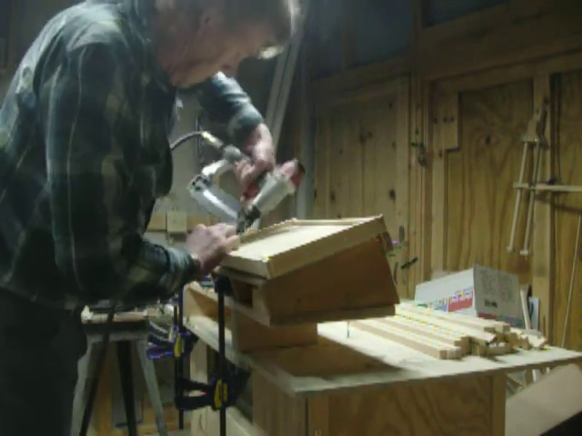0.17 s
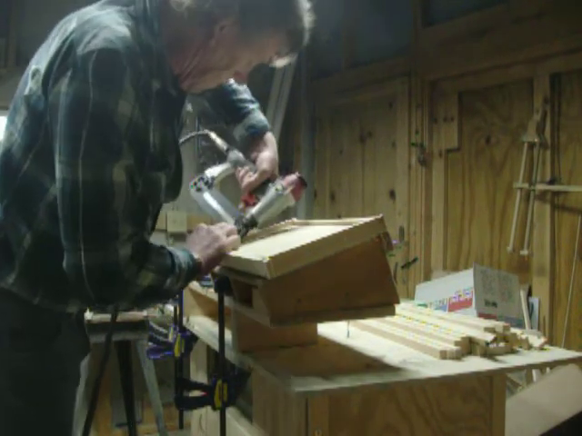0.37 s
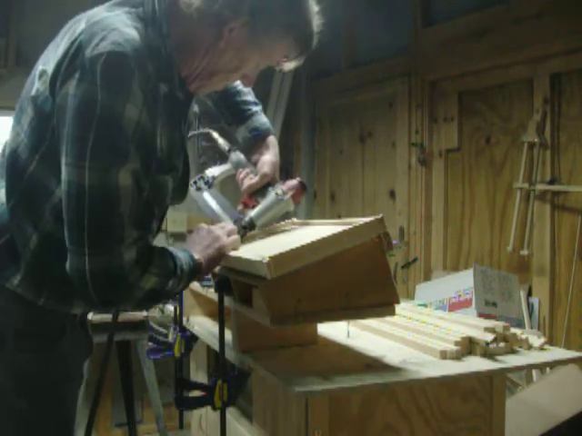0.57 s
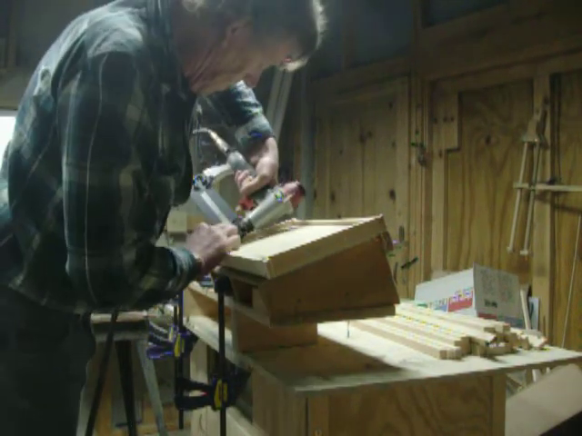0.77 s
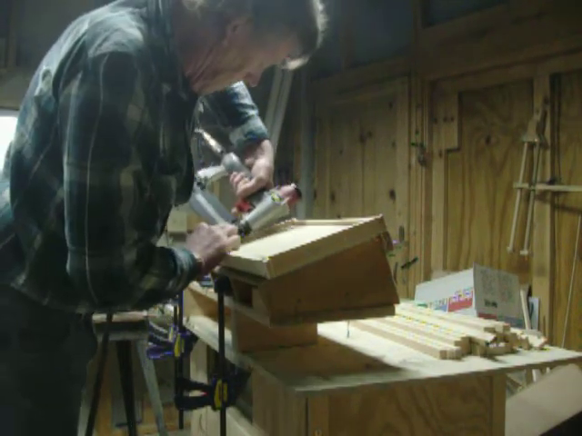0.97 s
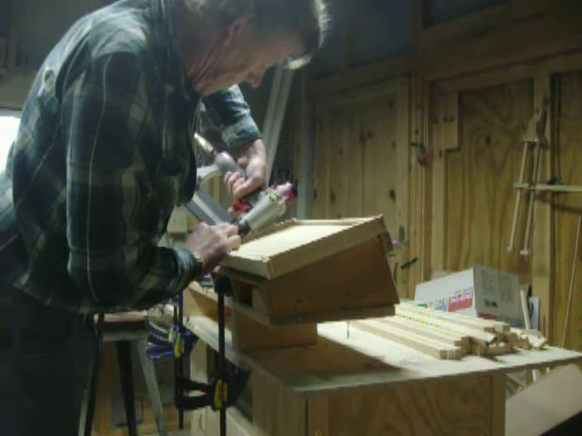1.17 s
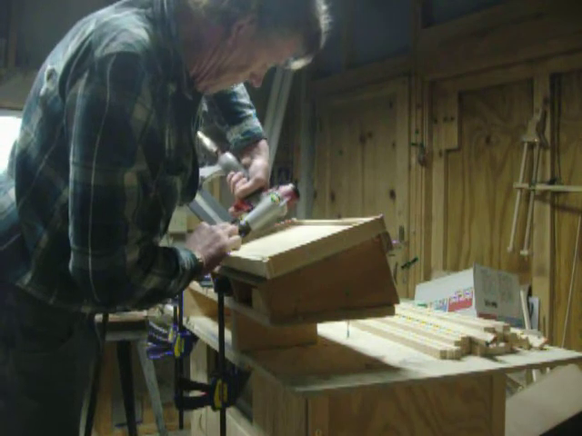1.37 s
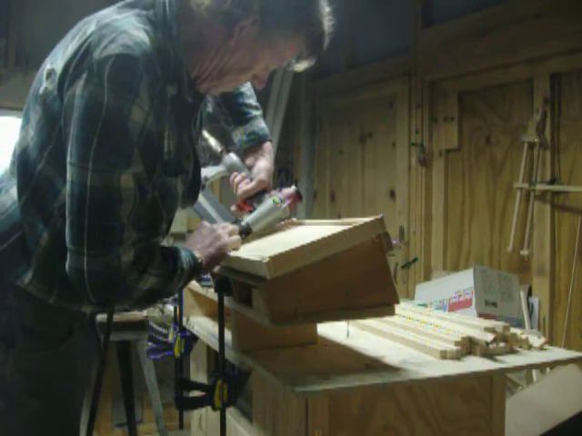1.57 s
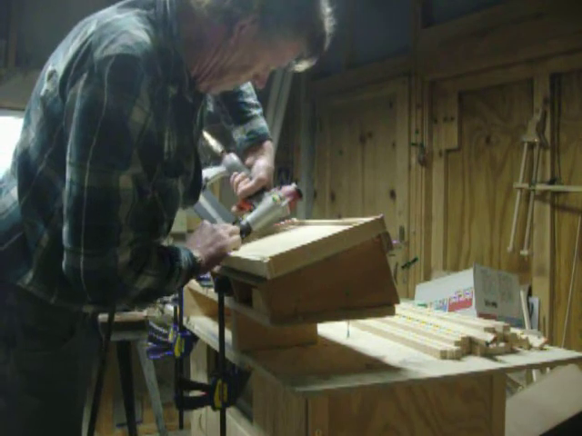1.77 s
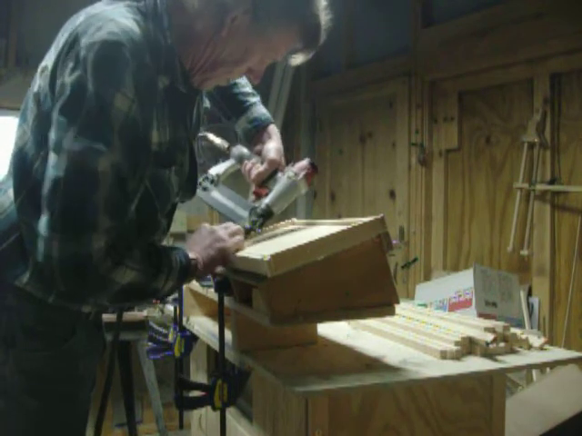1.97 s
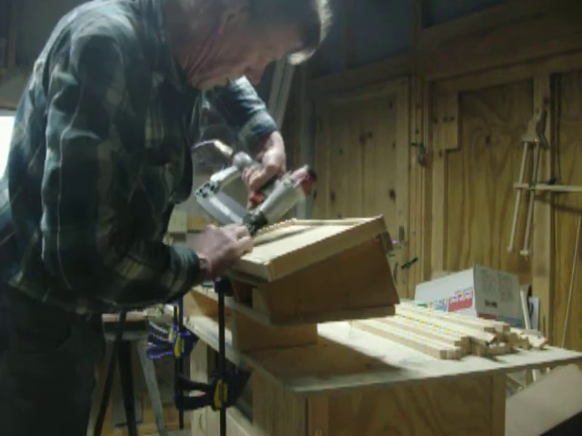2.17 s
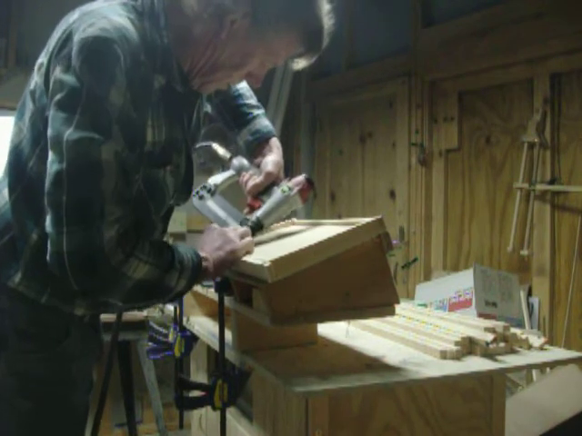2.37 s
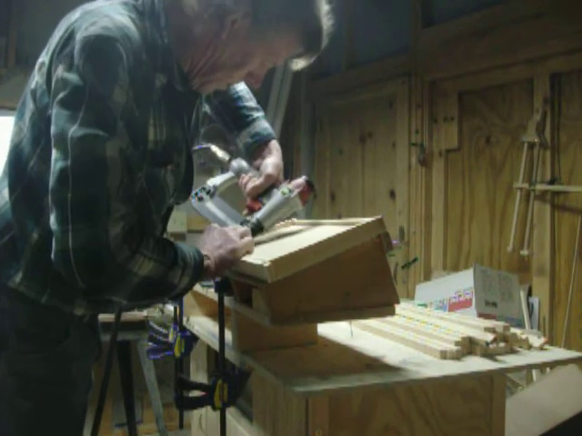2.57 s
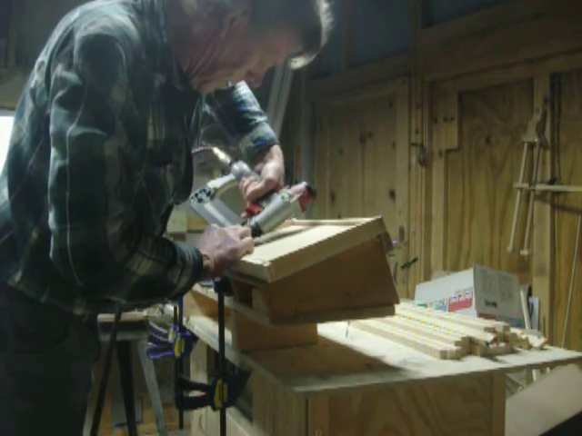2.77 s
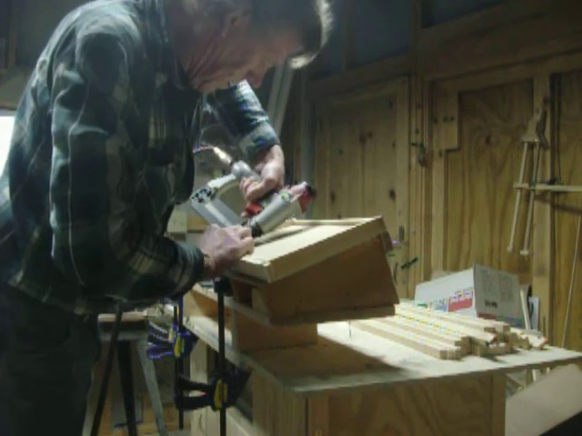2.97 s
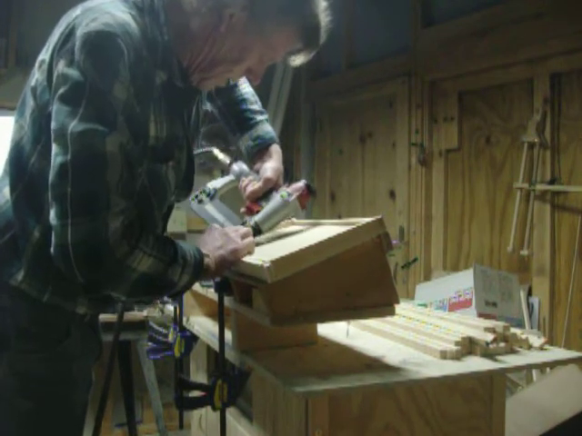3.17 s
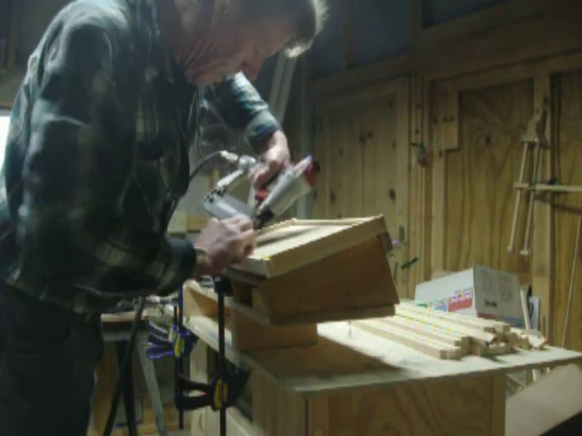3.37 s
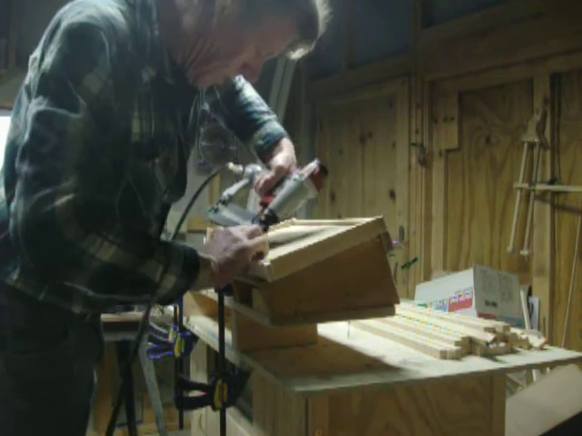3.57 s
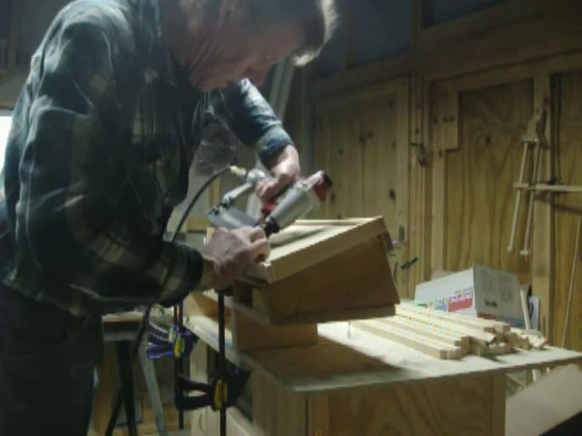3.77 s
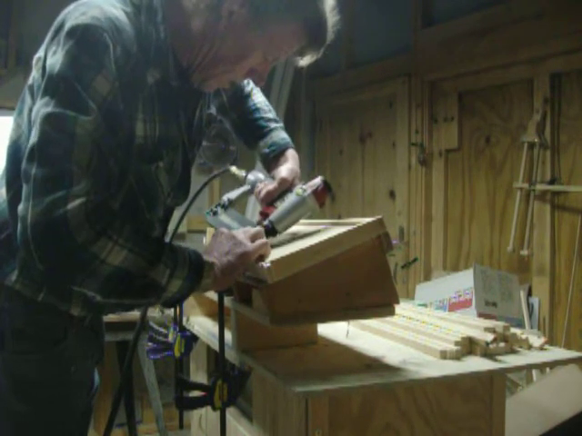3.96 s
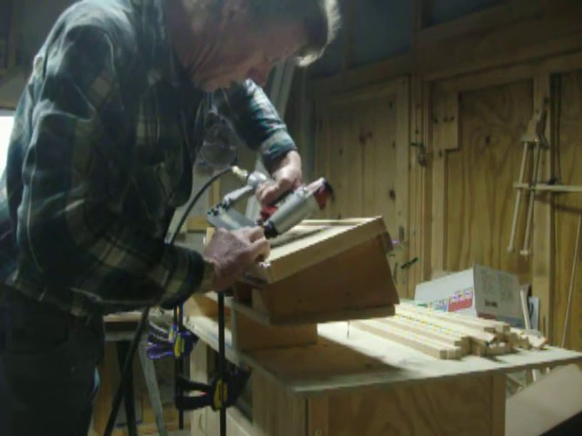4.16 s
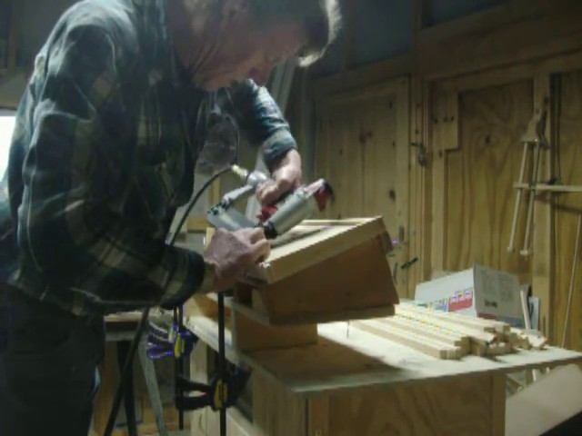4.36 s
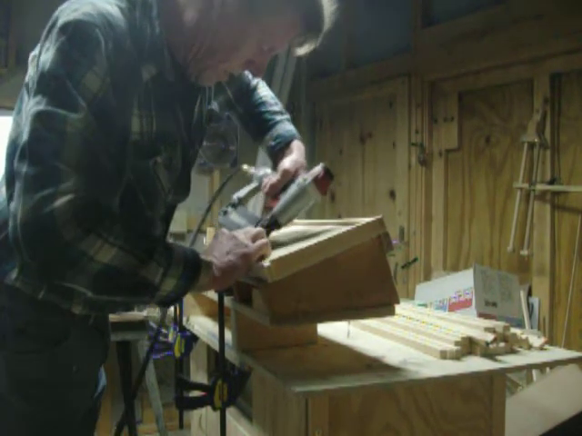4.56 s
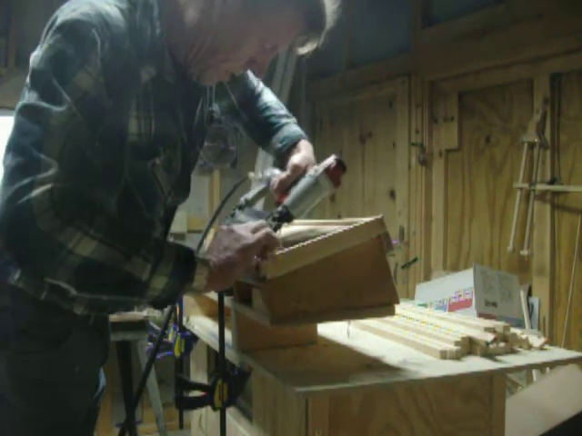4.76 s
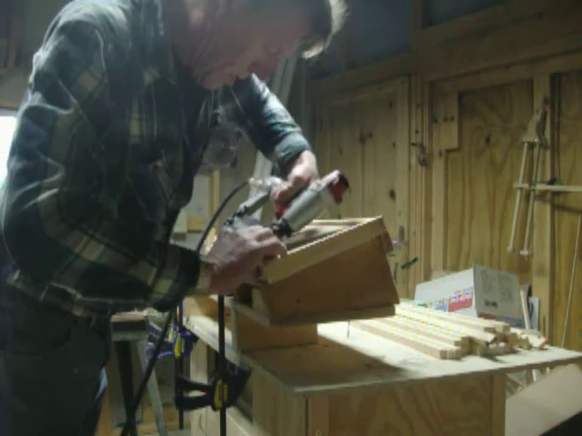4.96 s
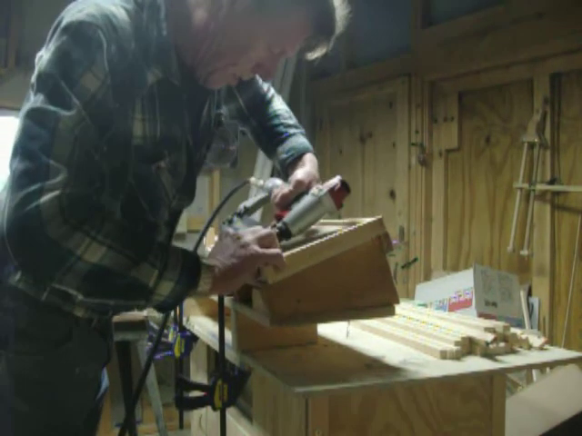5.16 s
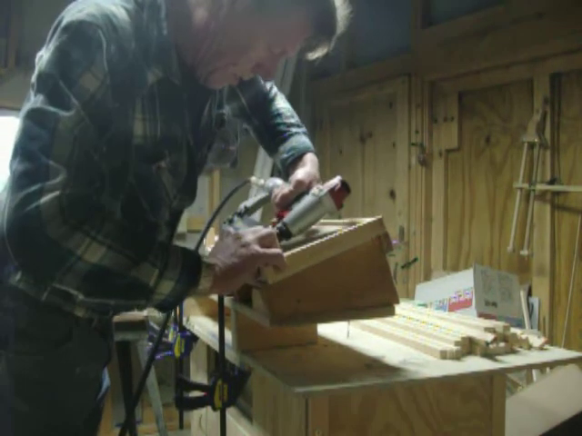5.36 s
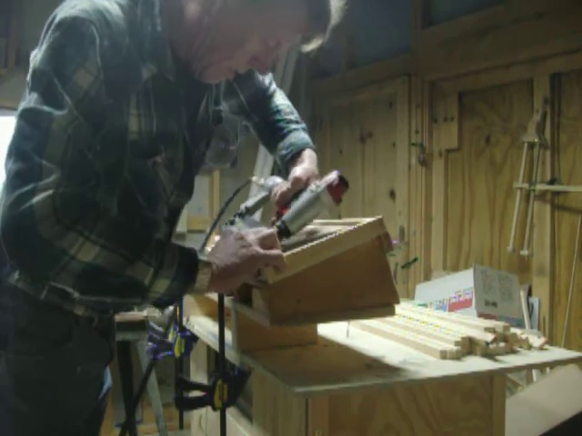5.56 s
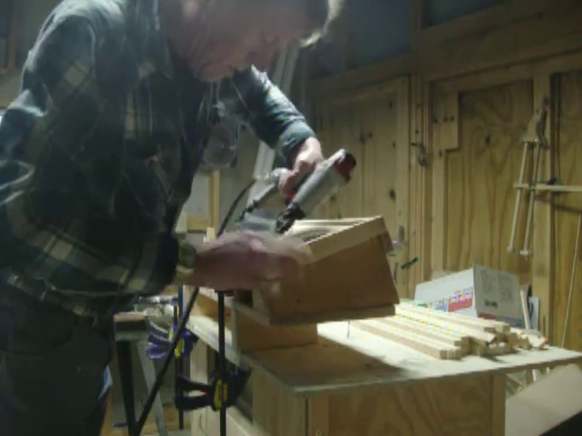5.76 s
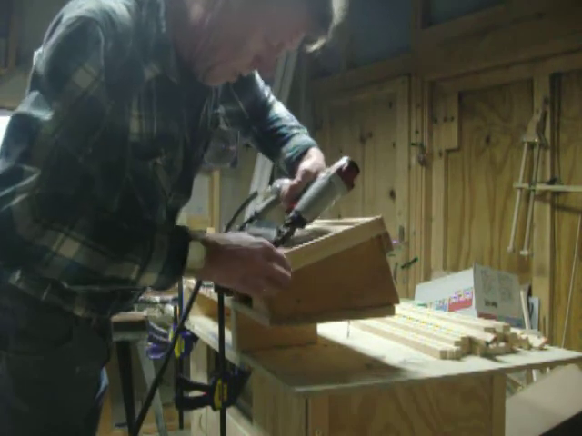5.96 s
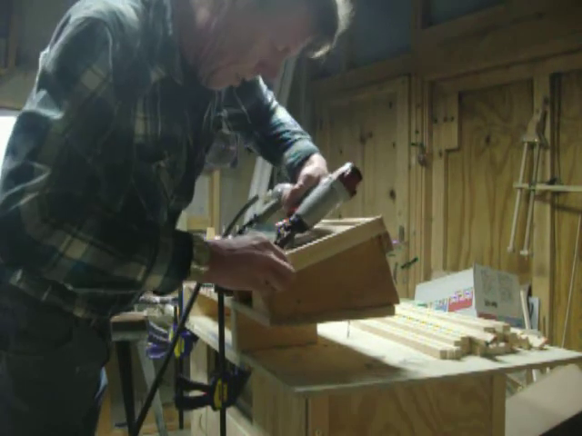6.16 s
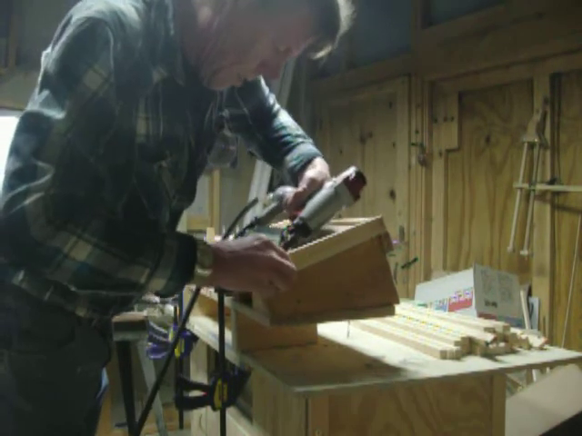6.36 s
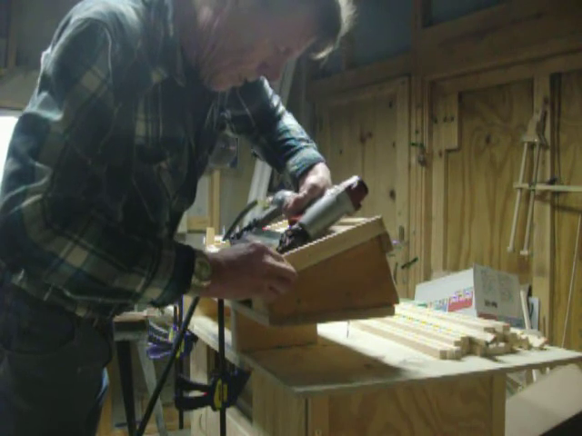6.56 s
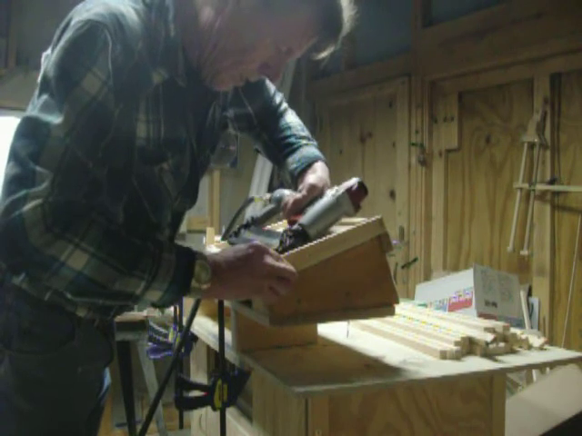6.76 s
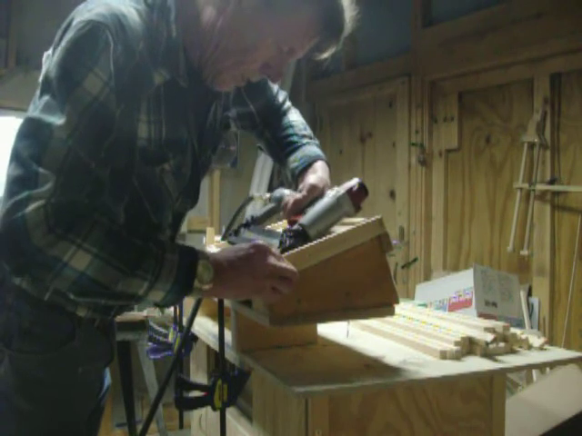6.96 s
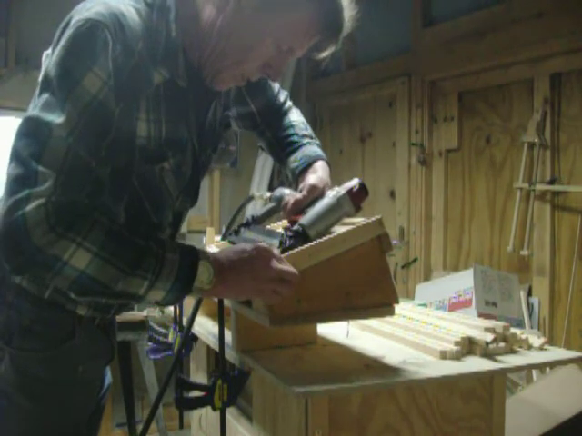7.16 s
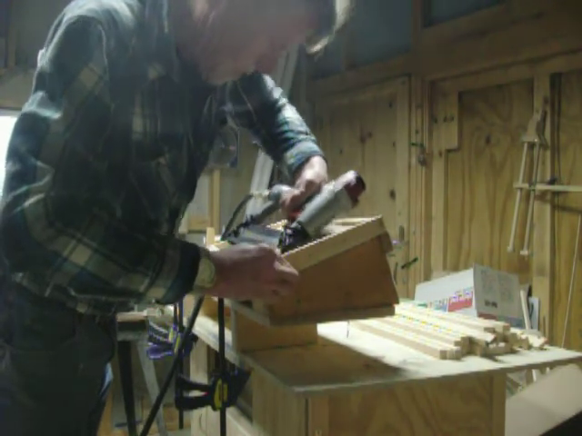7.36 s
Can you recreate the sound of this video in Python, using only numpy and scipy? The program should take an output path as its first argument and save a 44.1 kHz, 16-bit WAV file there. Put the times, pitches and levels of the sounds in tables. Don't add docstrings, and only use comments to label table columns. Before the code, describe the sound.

Close, rough, slightly clipped sound of brad nailing in a shed. Light metal ticks, a nose tap on wood and a faint squeak come first, then five separate double-hit shots: hiss and bang, followed by puff and knock. Wood drags and sharp safety clicks fill the gaps, with a busier clatter before the last shot. Shop hum and hiss sink after shots and swell back; echoes are short.

```python
import sys
import numpy as np
from scipy import signal
from scipy.io import wavfile
from scipy.ndimage import uniform_filter1d

SR = 44100
rng = np.random.default_rng(int(sys.argv[2]) if len(sys.argv) > 2 else 0)


def invert_db(x):
    u = np.asarray(x, float) / 20
    return 10 ** u


def wrap_up_sound(samples):
    columns = np.atleast_2d(samples).T
    tamed = np.clip(columns, -1, 1)
    steps = np.round(tamed * 32767).astype(np.int16)
    wavfile.write(sys.argv[1], SR, steps)


N = 326340

# (frequency [Hz], time to fall 60 dB [s])
SHOP_ECHO = [(60, 0.12), (150, 0.12), (300, 0.22), (600, 0.42), (1200, 0.34), (2500, 0.4), (4000, 0.38),
             (6000, 0.31)]
# (frequency [Hz], level [dB per Hz])
RUMBLE_COLOUR = [(15, -50), (28, -17), (54, -3.5), (86, -2.5), (140, -2), (167, -3), (190, 3.5), (250, -29),
                 (420, -120)]
# (frequency [Hz], level [dB per Hz])
HISS_COLOUR = [(170, -35), (290, -0.5), (393, 0), (596, -1), (975, -6.5), (1130, -7.5), (1520, -9),
               (2160, -9.5), (2820, -10), (2960, -11.5), (3910, -9), (5370, -24), (5940, -31), (7720, -80),
               (13100, -120)]
# (frequency [Hz], width [Hz], level over the hiss [dB])
LEAK = (3950, 460, -9.5)
# (frequency [Hz], width [Hz], level [dB])
FRAME = [(237, 360, 2.5), (442, 240, 8), (658, 130, 7), (789, 43, 8.5), (1007, 220, 9.5), (1255, 200, 3.5),
         (1453, 37, 9), (1950, 250, 8)]
# (strongest at [s], wood level [dB], scrape level [dB], centre of the wood sound [Hz], hold [s])
DRAGS = [(0.0, -43.5, -32, 590, 0.14), (0.267, -42, -57, 540, .012), (2.171, -26.5, -34, 834, 0.0037),
         (3.58, -20.5, -31, 575, .006), (3.686, -32.5, -37, 560, 0.008), (3.884, -31.5, -37.5, 596, 0.003),
         (4.81, -36.5, -40, 1180, .025), (4.844, -24, -29.5, 600, .02), (3.539, -42, -45, 850, .03),
         (6.904, -34, -42, 804, 0.046), (7.062, -26, -42, 590, 0.0044)]
# (frequency [Hz], level [dB per Hz])
TICK_COLOUR = [(710, -52), (1200, -5), (1490, -8), (1770, -9.5), (2280, -3.5), (2490, -5.5), (2570, -3),
               (3230, -4.5), (4000, 4), (5520, -15.5), (5940, -6.5), (7720, -57.5), (13100, -120)]
# (time [s], peak [dB], wood knock [dB], room [dB])
TICKS = [(0.04, -22.5, -58, -3), (0.7886, -27, -34.5, -8), (1.466, -20, -31, -12), (1.574, -27.5, -51, -5),
         (1.5875, -16.5, -33, -4), (2.3456, -27, -36.5, -9.5), (2.4226, -24.5, -29, -7.5),
         (2.5805, -17, -42, -7), (3.018, -18, -56, -0.5), (3.03, -27, -24, -5), (3.7928, -20.5, -56, -10),
         (3.895, -32, -29.5, -13.5), (4.2696, -24.5, -38.5, -5), (4.293, -23.5, -35, -12.5),
         (5.0064, -28.5, -37.5, 8.5), (5.37, -37, -41, -2), (6.006, -29, -45.5, 2),
         (6.162, -25.5, -65, -4.5), (6.712, -27.5, -47, -4), (6.9033, -27, -33, 0), (7.0496, -20, -29, -9)]
# (time [s], peak [dB], wood knock [dB], room [dB])
SET_DOWNS = [
    (0.6175, -5.5, -22, -7),
    (0.635, -12, -25, -24),
    (0.9033, -18.5, -26, -7),
    (0.9095, -12, -24, -10),
    (2.6505, -8, -14.5, -6),
    (6.409, -20, -40, -12),
    (6.4974, -14, -21.5, 0),
    (6.5214, -10, -25, -15.5),
]
# (time [s], peak [dB], wood knock [dB], room [dB])
CLUNKS = [
    (0.71, -49, -62, -7),
    (.745, -39, -60, 0),
    (1.5344, -24.5, -27, -10.5),
    (3.5807, -33, -21, -6),
    (3.686, -26.5, -29, -12),
    (4.28, -28, -34, -12.5),
    (6.5036, -8.5, -17.5, -9),
    (6.743, -34, -67, 5),
]
# (time [s], peak [dB], wood knock [dB],
# room [dB])
TICKS_SHARP = [
    (4.9948, -6, -28.5, -10.5),
    (6.375, -9, -36, -5.5),
    (6.4636, -7, -23, -4.5),
    (6.471, -7, -20.5, -10),
]
# (events, centre [Hz], width [Hz], broad share, rise [s], length [s], echo build-up [s])
PARTS = [(SET_DOWNS, 3320, 3500, 0.32, 0.0031, 0.012, .0026),
         (TICKS, 3630, 2300, 0.62, 0.00039, 0.018, .0026), (CLUNKS, 2550, 1100, 0.26, 0.0047, .018, .004),
         (TICKS_SHARP, 3770, 1400, 0.89, 0.001, 0.0047, 0.0079)]
# (time [s], length [s], start pitch [Hz], end pitch [Hz], level [dB])
SQUEAKS = [
    (0.743, 0.047, 2650, 2950, -40),
    (0.87, .06, 2750, 2500, -44),
    (2.273, 0.038, 2520, 2900, -47),
]
# (time [s], peak [dB], low push [dB], room [dB])
VALVES = [
    (1.6065, -13, -33, -18),
    (3.0452, -14, -31, -18),
    (4.3125, -12, -32, -5),
    (5.4032, -11, -36.5, -8.5),
    (7.1808, -11, -31.5, -7.5),
]
# (frequency [Hz], level [dB per Hz])
VALVE_COLOUR = [(120, -50), (200, -12), (281, -15), (717, -21), (980, -17.5), (1590, -11.5), (2570, -9.5),
                (2840, 0.5), (3560, -2), (3990, 4), (4600, -5.5), (5300, -12), (5940, -6), (7720, -55),
                (13100, -120)]
# (time [s], peak [dB], low push [dB], room [dB])
BLOWS = [
    (1.6348, -4, -21, -1.5),
    (3.0712, -3.5, -19.5, -2.1),
    (4.3384, -4.5, -18.5, -0.3),
    (5.4296, -1.5, -17, -4),
    (7.2078, -4.5, -23.5, -0.2),
]
# (frequency [Hz], level [dB per Hz])
BLOW_COLOUR = [(35, -51), (60, -5), (290, -4), (435, 0), (527, -5.5), (651, -2), (820, -4), (1180, 0.5),
               (1640, -3), (1990, 0), (3090, -0.5), (3820, 5), (4810, -5.5), (5940, -23), (7720, -45.5),
               (13100, -120)]
# (time [s], peak [dB], low push [dB], room [dB])
EXHAUSTS = [
    (1.7612, -14.5, -46, 4),
    (3.2032, -13.5, -48, 2),
    (4.4792, -13, -46, 1.5),
    (5.5862, -10.5, -46, -0.5),
    (7.3662, -11, -46, 2),
]
# (frequency [Hz], level [dB per Hz])
EXHAUST_COLOUR = [(120, -52.5), (200, -3), (517, -15), (1100, -14.5), (1480, -18.5), (2020, -17.5),
                  (2460, -7.5), (3320, -2.5), (4050, 4.5), (4670, -2), (5010, -10), (5530, -10.5),
                  (5940, -23.5), (7720, -52), (13100, -120)]
# (time [s], peak [dB], low push [dB], room [dB])
RETURNS = [
    (1.785, -8.5, -43.5, -0.73),
    (3.2272, -6, -30.5, -2.1),
    (4.5022, -7.5, -35.5, -1.7),
    (5.6092, -8, -33.5, -0.59),
    (7.39, -8, -23, -1.9),
]
# (frequency [Hz], level [dB per Hz])
RETURN_COLOUR = [(35, -61), (60, -10.5), (308, -6.5), (410, -3), (497, -5.5), (664, -3), (836, -2.5),
                 (1120, -0.5), (1400, -7), (1610, -3.5), (1910, -2.5), (2600, 0.5), (3890, 3), (4720, -27),
                 (5940, -45), (7720, -90.5), (13100, -120)]
# (time [s], level [dB], frequency [Hz], time to fall 60 dB [s])
RINGING_PARTS = [(5.09, -45, 2070, 1.5), (3.582, -24, 640, .3), (6.55, -32, 2040, 1.2),
                 (6.50, -26, 1310, .33), (6.50, -24, 1510, .22), (6.58, -40, 3520, 1.1),
                 (6.74, -44, 2760, .3), (7.05, -38, 3560, .3), (7.056, -27, 605, .32)]

RUMBLE_DB, HUM_DB, HISS_DB = -46.5, -45.5, -40.5
RUMBLE_SHARE, HUM_SHARE, HISS_SHARE = 0.95, 1, 0.4
HUM_HZ, HUM_WIDTH_HZ = 237, 14
RUSTLE_DB, DRIFT_DB, AMP_HISS_DB = -0.76, -66, -48.5
DUCK_FROM_DB, DUCK_DEPTH_DB = -16, 23
CLOSE_PER_DB_S, HOLD_S, REOPEN_S = 10, 0.22, 0.6
DRAG_RISE_S, DRAG_FROM_DB = 0.028, -27.5
WOOD_FALL_DB_PER_S, SCRAPE_FALL_DB_PER_S, SAG_PER_S = 162, 143.5, 0.8
LIMIT_DB, KNEE, CEILING, EDGE_HZ = -5.5, 0.58, 0.72, 6870


def evened(x):
    return x / np.sqrt(np.mean(x ** 2) + 1e-20)


def read(points, hz):
    f, value = np.transpose(points)
    return np.interp(np.log(hz + 1), np.log(f + 1), value)


def add(mix, s, sound):
    part = mix[round(s * SR):][:len(sound)]
    part += sound[:len(part)]


def colour(points):
    hz = abs(np.fft.fftfreq(4096, 1 / SR))
    log_gain = np.log(invert_db(np.maximum(read(points, hz), -80)))
    taps = np.fft.ifft(np.exp(np.conj(signal.hilbert(log_gain)))).real[:2048]
    return taps / np.linalg.norm(taps)


def resonate(x, hz, width):
    turn = np.exp(2j * np.pi * np.cumsum(hz * np.ones(len(x))) / SR)
    r = np.exp(-np.pi * width / SR)
    return 2 * (turn * signal.lfilter([1 - r], [1, -r], x / turn)).real


def resonate_twice(x, hz, width):
    return resonate(resonate(x, hz, width), hz, width)


def burst(rise, hold, t60):
    t = np.arange(round(0.12 * SR)) / SR
    fade = invert_db(-60 * np.maximum(t - hold, 0) / t60)
    return rng.standard_normal(len(t)) * np.clip(t / rise, 0, 1) * fade


def push(db, length):
    u = np.arange(4000) / SR / length
    return invert_db(db) * u * (2 - u) * np.exp(-u)


def shop_tail(build=0.0017):
    hz, t, z = signal.stft(rng.standard_normal(SR), SR, nperseg=512)
    fade = invert_db(-60 * t / read(SHOP_ECHO, hz)[:, None])
    tail = signal.istft(z * fade, SR, nperseg=512)[1]
    return tail * (1 - np.exp(-np.arange(len(tail)) / SR / build))


TAILS = [shop_tail() for _ in range(7)]


def in_shop(x, taps, db, room_db, place, spread):
    seed = 0.5 * x / np.linalg.norm(x)
    seed[:len(taps)] += taps / np.linalg.norm(taps)
    wet = signal.fftconvolve(seed / np.linalg.norm(seed), TAILS[place % len(TAILS)])
    wet *= 1 - np.exp(-np.arange(len(wet)) / SR / spread)
    peak = np.sqrt(uniform_filter1d(x ** 2, 128).max())
    wet[:len(x)] += invert_db(-room_db) * x / peak
    return invert_db(db + room_db) * wet


def wood(x):
    modes = sum(invert_db(db) * resonate(x, hz, width) for hz, width, db in FRAME)
    return signal.sosfilt(signal.butter(4, 150, "high", fs=SR, output="sos"), modes)


def ducking(loud):
    step = 220
    power = abs(uniform_filter1d(loud ** 2, 2 * step))[::step]
    over_db = np.maximum(10 * np.log10(power + 1e-12) - DUCK_FROM_DB, 0)
    charge = np.zeros(len(over_db))
    for k in range(1, len(charge)):
        change = (CLOSE_PER_DB_S * over_db[k] - 1 / REOPEN_S) * step / SR
        charge[k] = min(max(charge[k - 1] + change, 0), 1 + HOLD_S / REOPEN_S)
    return DUCK_DEPTH_DB * np.interp(np.arange(N), np.arange(len(charge)) * step, np.minimum(charge, 1))


def background(duck_db):
    noise = rng.standard_normal((6, N))
    rumble = evened(signal.fftconvolve(noise[0], colour(RUMBLE_COLOUR))[:N])
    rumble += 0.51 * evened(resonate_twice(noise[4], 56, 22))
    hum = evened(resonate_twice(noise[1], HUM_HZ, HUM_WIDTH_HZ))
    hum += 0.6 * np.sin(2 * np.pi * HUM_HZ * np.arange(N) / SR)
    hiss = evened(signal.fftconvolve(noise[2], colour(HISS_COLOUR))[:N])
    leak_hz, leak_width, leak_db = LEAK
    flutter_db = 4.5 * evened(uniform_filter1d(noise[3], 3000))
    hiss += invert_db(leak_db + flutter_db) * evened(resonate_twice(noise[4], leak_hz, leak_width))
    rustle = evened(uniform_filter1d(uniform_filter1d(noise[1], 9000), 5000))
    drift = evened(resonate_twice(noise[3], 18, 20))
    rumble *= invert_db(RUMBLE_DB - RUMBLE_SHARE * duck_db)
    hum *= invert_db(HUM_DB - HUM_SHARE * duck_db)
    hiss *= invert_db(HISS_DB - HISS_SHARE * duck_db + RUSTLE_DB * rustle)
    return rumble + hum + hiss + drift * invert_db(DRIFT_DB) + noise[5] * invert_db(AMP_HISS_DB)


def drags():
    lead = SR // 10
    out, taps = np.zeros(N + lead), colour(TICK_COLOUR)
    for s, wood_db, scrape_db, top_hz, hold in DRAGS:
        t = np.arange(round(0.4 * SR)) / SR - DRAG_RISE_S
        swell_db = DRAG_FROM_DB * np.clip(-t / DRAG_RISE_S, 0, 1)
        after = np.maximum(t - hold, 0)
        hz = top_hz * (1 - SAG_PER_S * after)
        grip_db = 1.8 * evened(uniform_filter1d(rng.standard_normal(len(t)), 120))
        slips = rng.standard_normal(len(t)) * invert_db(grip_db)
        body = evened(wood(slips))
        body += 1.8 * evened(wood(resonate(resonate(slips, hz, 520), hz, 500)))
        body += 0.3 * evened(resonate(slips, hz, 90))
        scrape = signal.fftconvolve(slips, taps)[:len(t)]
        scrape += 0.48 * resonate(slips, 3100, 450) + 1.5 * resonate(slips, 1300, 800)
        sound = invert_db(wood_db - WOOD_FALL_DB_PER_S * after) * evened(body)
        sound += invert_db(scrape_db - SCRAPE_FALL_DB_PER_S * after) * evened(scrape)
        add(out, s + 0.1 - DRAG_RISE_S, invert_db(swell_db) * sound)
    return out[lead:]


def ticks():
    out, place = np.zeros(N), 0
    metal = colour(TICK_COLOUR)
    knock_taps = wood(np.pad(signal.windows.hann(24), (0, 2024)))
    for rows, hz, width, broad, rise, length, build in PARTS:
        taps = broad * metal + resonate_twice(metal, hz, width)
        for s, db, knock_db, room_db in rows:
            place += 1
            click = signal.fftconvolve(burst(rise, 0.00091, length + 0.0084), taps)
            knock = wood(burst(0.00081, 0.0025, 0.0024))
            add(out, s, in_shop(click, taps, db - 6, room_db, place, build))
            add(out, s, in_shop(knock, knock_taps, knock_db, room_db + 4, place + 1, 0.0087))
            add(out, s, push(db - 17.5, 0.00097))
    return out


def squeaks():
    out = np.zeros(N)
    for s, length, from_hz, to_hz, db in SQUEAKS:
        hz = np.linspace(from_hz, to_hz, round(length * SR))
        whistle = evened(resonate_twice(rng.standard_normal(len(hz)), hz, 120))
        add(out, s, invert_db(db) * np.hanning(len(hz)) * whistle)
    return out


def wood_crack(hz, db):
    t = np.arange(round(0.3 * SR)) / SR
    pitch = hz * rng.uniform(0.89, 1.075)
    return invert_db(db - 60 * t / 0.011) * np.sin(2 * np.pi * pitch * t)


def shot_step(rows, points, place, rise, hold, t60, push_s, crack_db, crack_hz, swing_db, swing_s):
    out, taps = np.zeros(N), colour(points)
    for k, (s, db, push_db, room_db) in enumerate(rows, place):
        air = signal.fftconvolve(burst(rise, hold, t60), taps)
        add(out, s, in_shop(air, taps, db, room_db, k, rise + hold))
        add(out, s, push(push_db + 20.5, 0.31 * push_s))
        add(out, s, push(push_db + swing_db, swing_s))
        add(out, s, wood_crack(crack_hz, db + crack_db))
    return out


def valve_hisses():
    return shot_step(VALVES, VALVE_COLOUR, place=1, rise=0.0008, hold=0.004, t60=0.11, push_s=0.0025,
                     crack_db=-18, crack_hz=600, swing_db=19, swing_s=0.008)


def piston_blows():
    return shot_step(BLOWS, BLOW_COLOUR, place=6, rise=0.004, hold=0.008, t60=0.08, push_s=0.003,
                     crack_db=6, crack_hz=1100, swing_db=9, swing_s=0.005)


def exhaust_puffs():
    return shot_step(EXHAUSTS, EXHAUST_COLOUR, place=11, rise=0.003, hold=0.008, t60=0.09, push_s=0.004,
                     crack_db=-30, crack_hz=600, swing_db=13, swing_s=0.0055)


def piston_returns():
    return shot_step(RETURNS, RETURN_COLOUR, place=16, rise=0.0006, hold=0.005, t60=0.06, push_s=0.0025,
                     crack_db=3, crack_hz=1500, swing_db=15, swing_s=0.0055)


def ringing_parts():
    out, t = np.zeros(N), np.arange(SR) / SR
    for s, db, hz, t60 in RINGING_PARTS:
        pair = np.sin(2 * np.pi * hz * t) + 0.25 * np.sin(2 * np.pi * (hz + 66) * t)
        add(out, s, invert_db(db - 60 * t / t60) * pair * np.clip(t / 0.0099, 0, 1))
    return out


def scene():
    shots = valve_hisses() + piston_blows() + exhaust_puffs() + piston_returns()
    work = drags() + ticks() + shots + ringing_parts()
    return (background(ducking(work)) + work + squeaks())[None]


def top_cut(x):
    return signal.sosfilt(signal.butter(12, 15870, fs=SR, output="sos"), x)


def record(dry):
    power = signal.lfilter([0.006], [1, -0.994], dry ** 2)
    over_db = np.maximum(10 * np.log10(power + 1e-12) - LIMIT_DB, 0)
    limited = dry / invert_db(0.15 * over_db)
    soft = limited / (1 + (limited / KNEE) ** 4) ** 0.25
    narrow = signal.sosfilt(signal.cheby2(14, 85, EDGE_HZ, fs=SR, output="sos"), soft)
    return top_cut(np.clip(narrow, -CEILING, CEILING))


dry = scene()
out = record(dry)
wrap_up_sound(out)
```